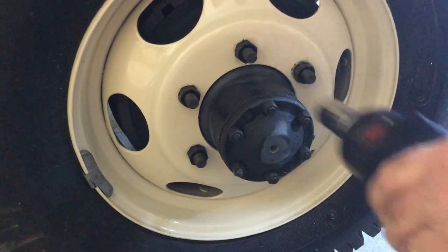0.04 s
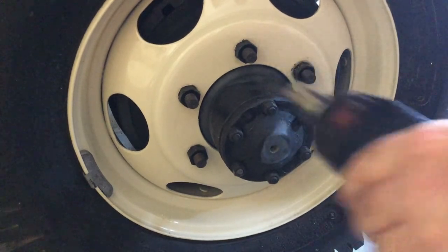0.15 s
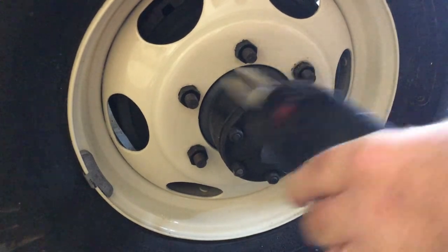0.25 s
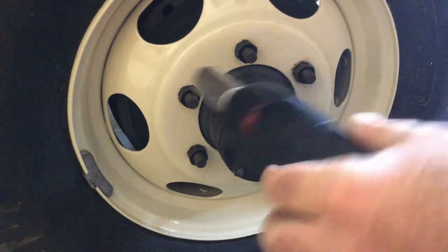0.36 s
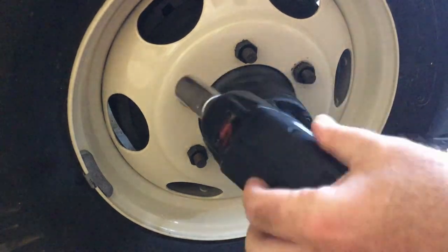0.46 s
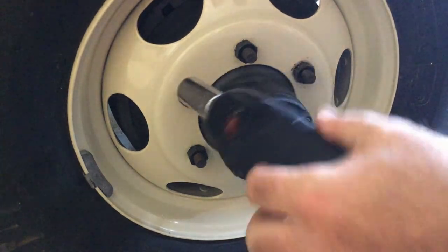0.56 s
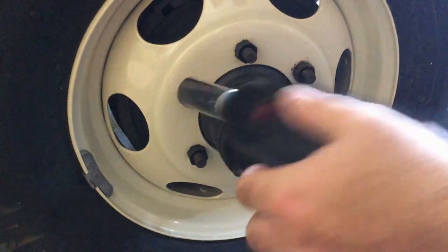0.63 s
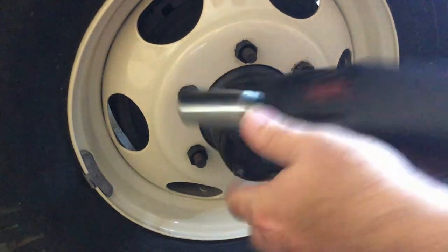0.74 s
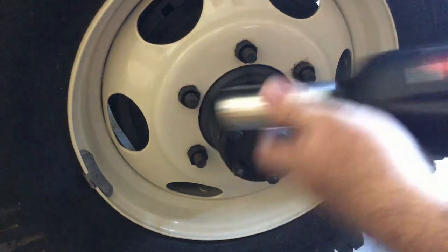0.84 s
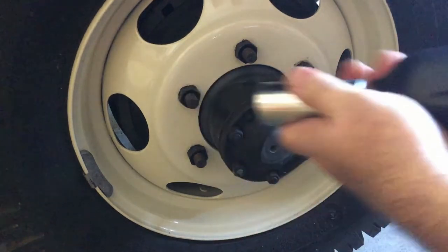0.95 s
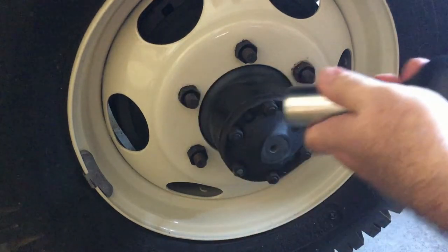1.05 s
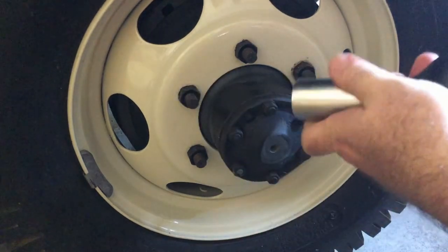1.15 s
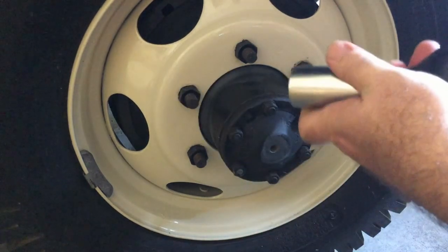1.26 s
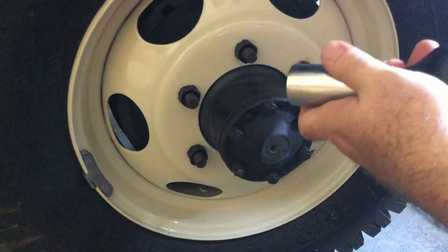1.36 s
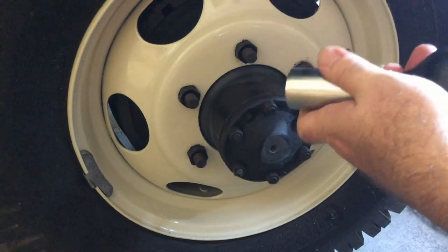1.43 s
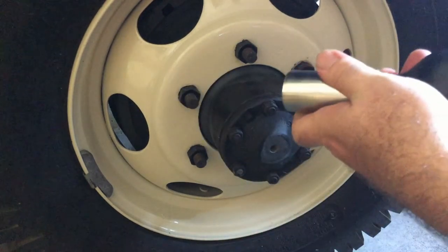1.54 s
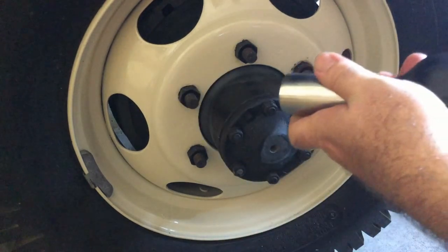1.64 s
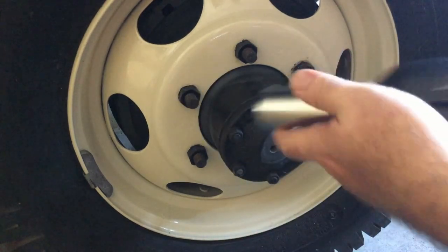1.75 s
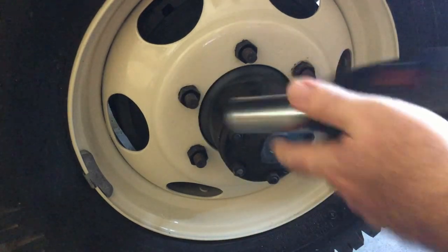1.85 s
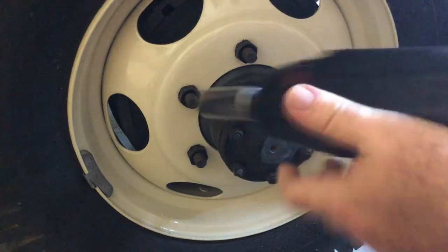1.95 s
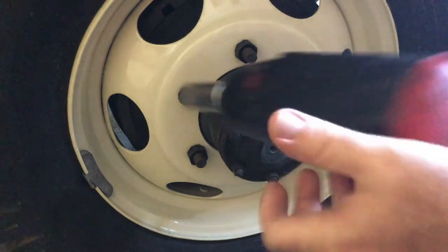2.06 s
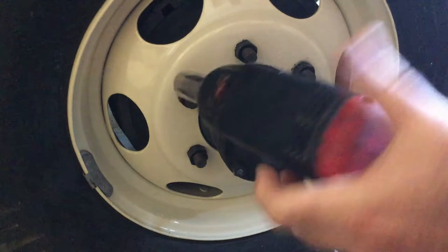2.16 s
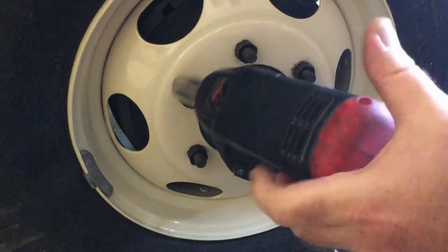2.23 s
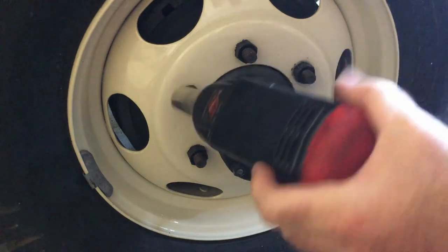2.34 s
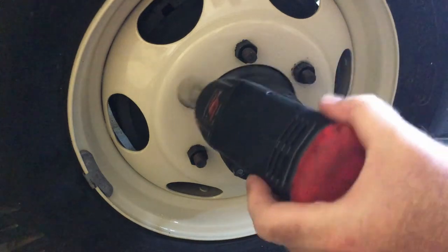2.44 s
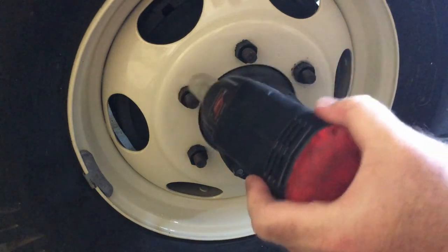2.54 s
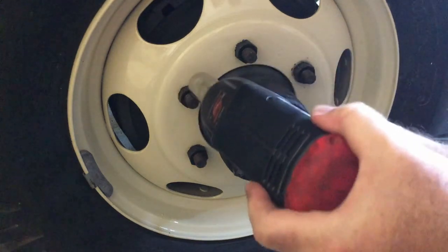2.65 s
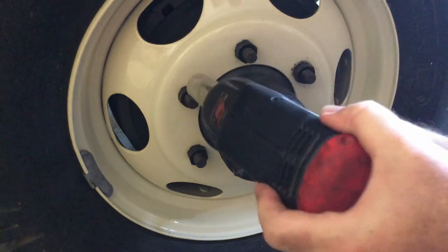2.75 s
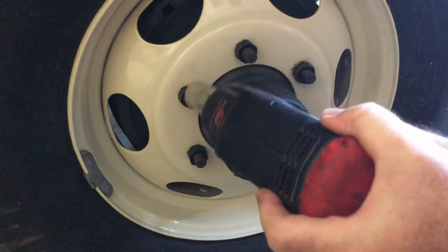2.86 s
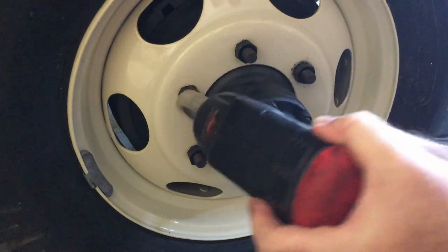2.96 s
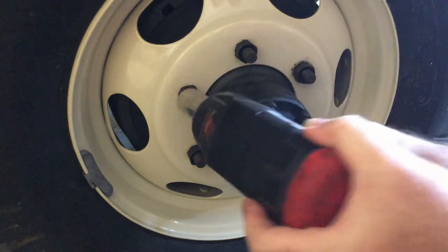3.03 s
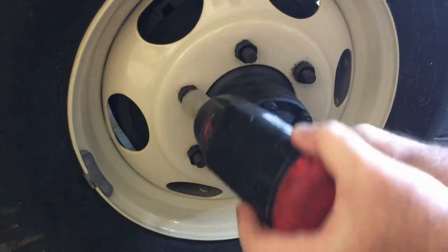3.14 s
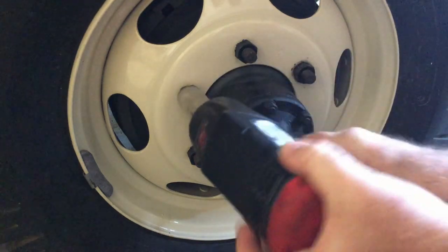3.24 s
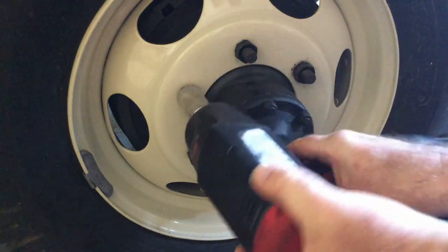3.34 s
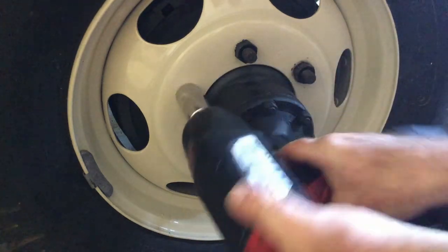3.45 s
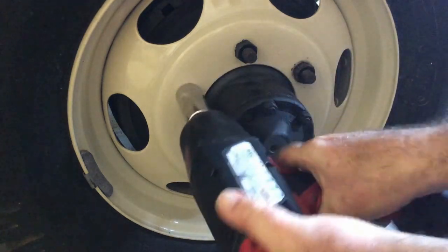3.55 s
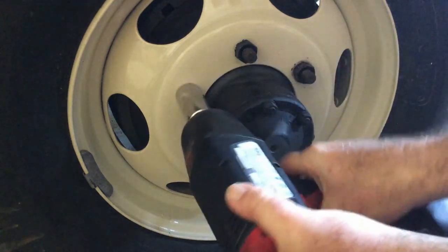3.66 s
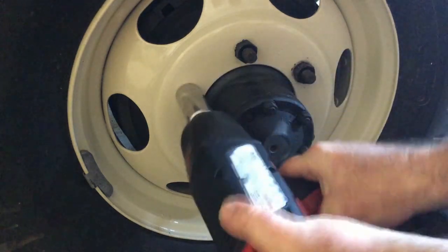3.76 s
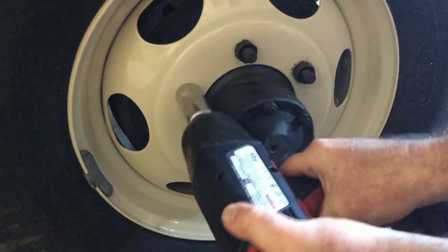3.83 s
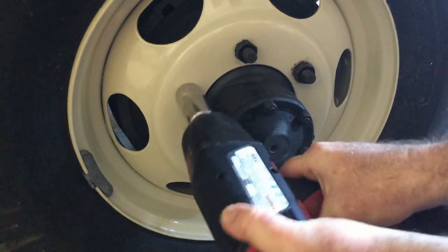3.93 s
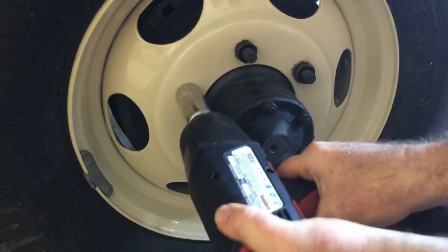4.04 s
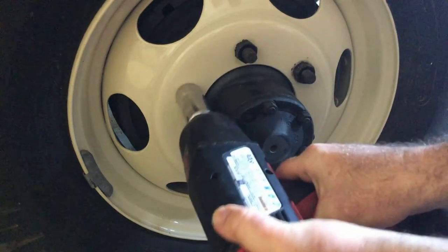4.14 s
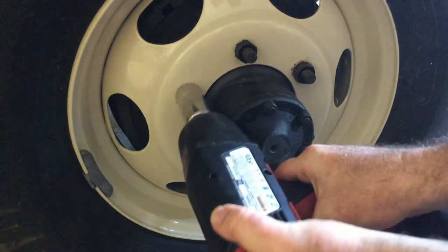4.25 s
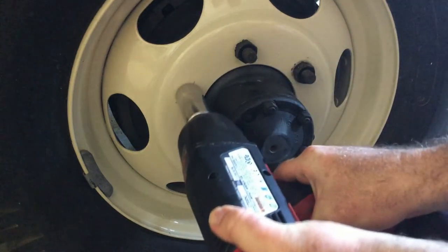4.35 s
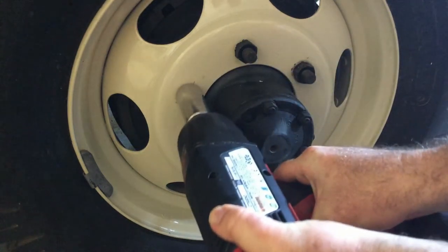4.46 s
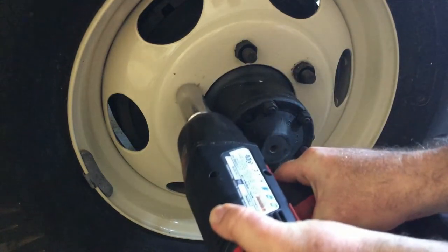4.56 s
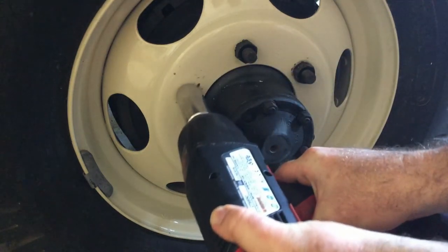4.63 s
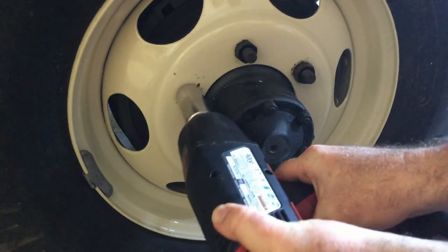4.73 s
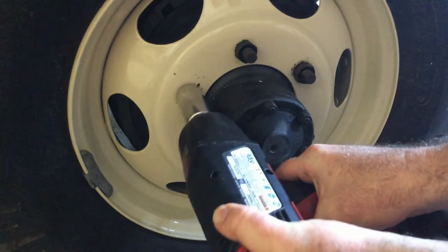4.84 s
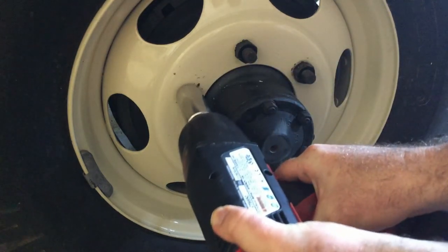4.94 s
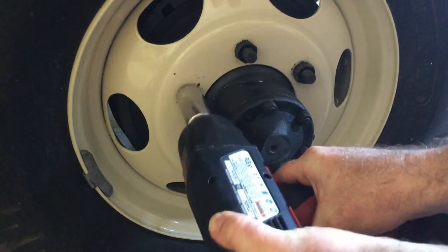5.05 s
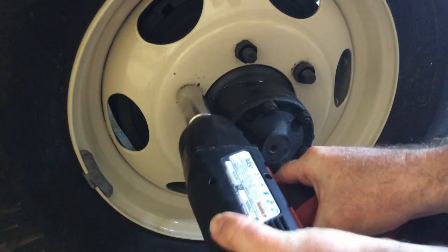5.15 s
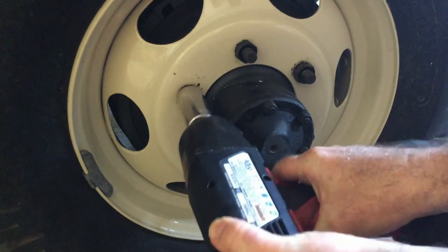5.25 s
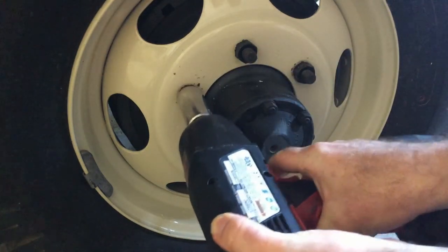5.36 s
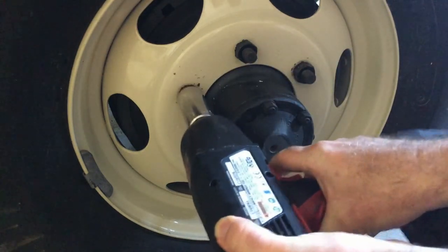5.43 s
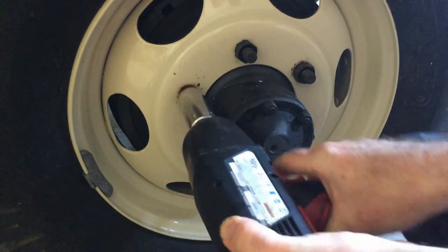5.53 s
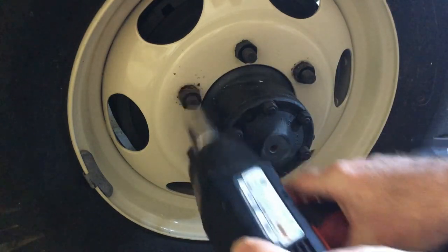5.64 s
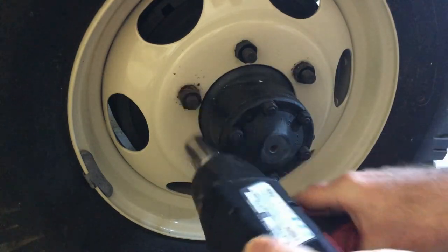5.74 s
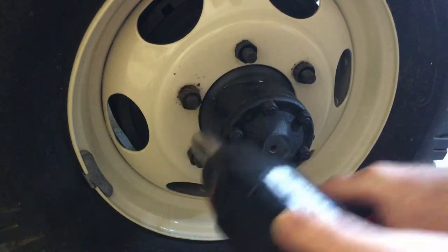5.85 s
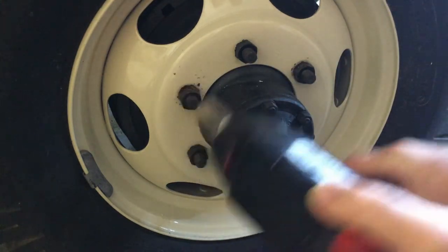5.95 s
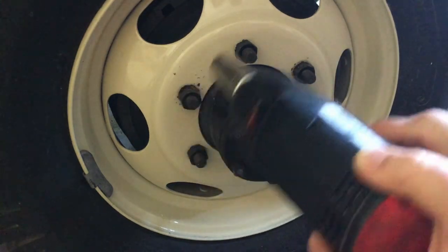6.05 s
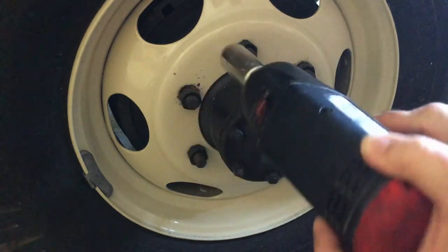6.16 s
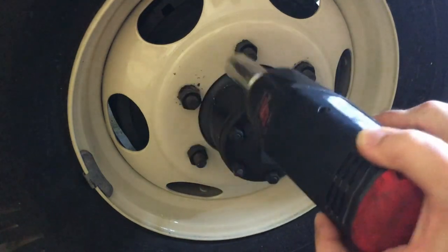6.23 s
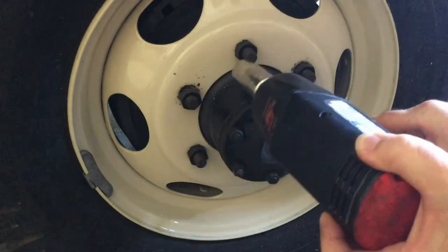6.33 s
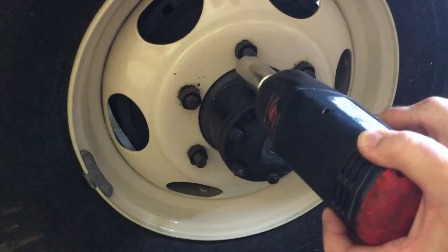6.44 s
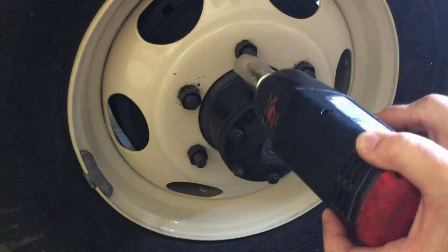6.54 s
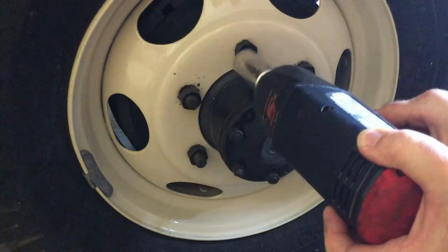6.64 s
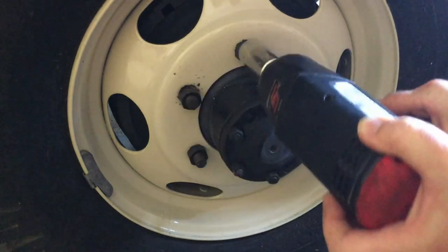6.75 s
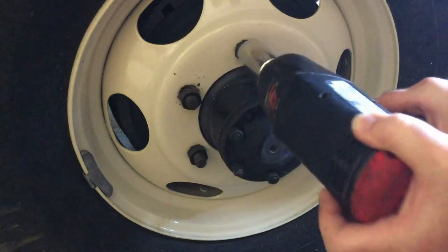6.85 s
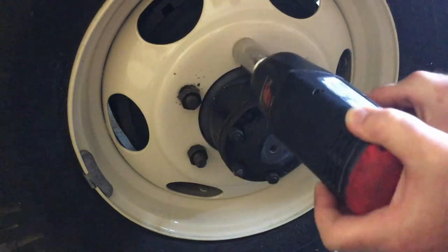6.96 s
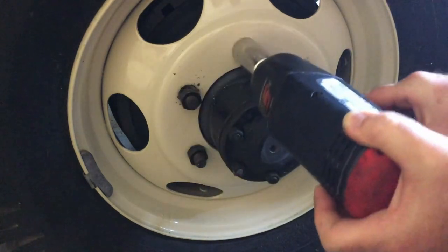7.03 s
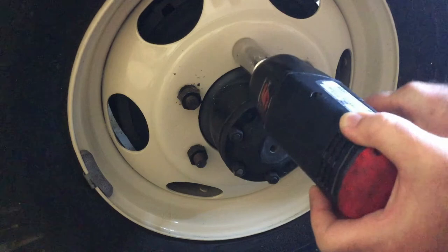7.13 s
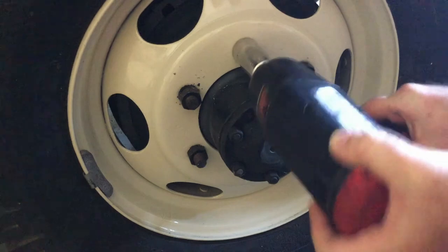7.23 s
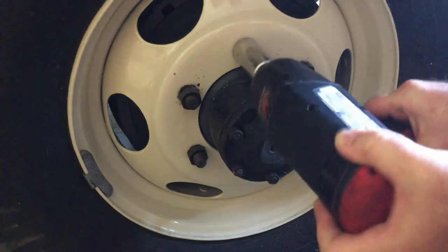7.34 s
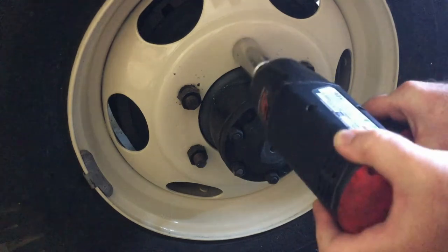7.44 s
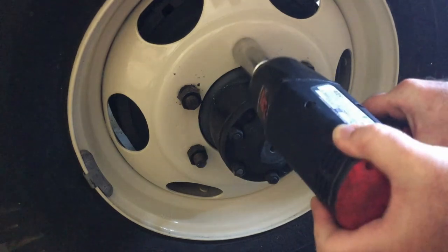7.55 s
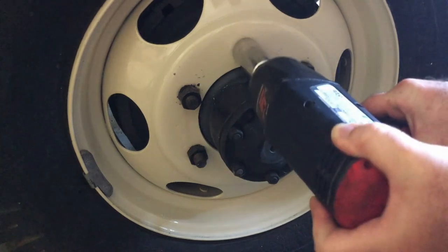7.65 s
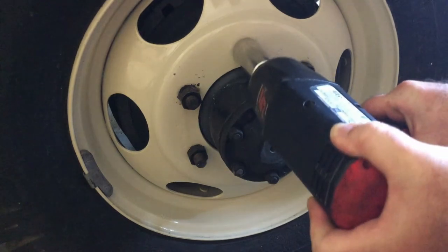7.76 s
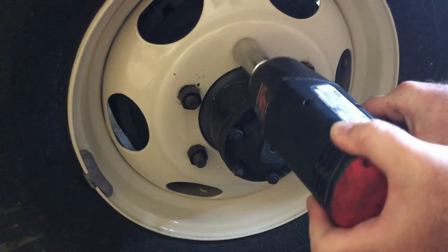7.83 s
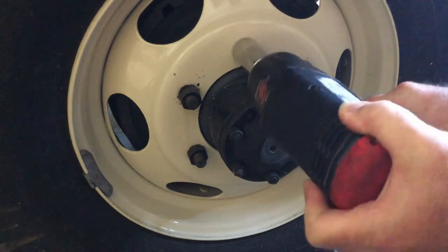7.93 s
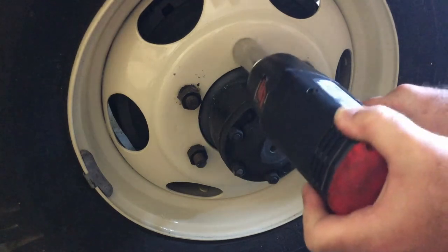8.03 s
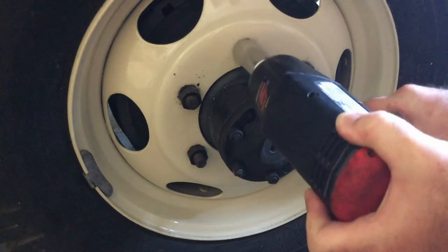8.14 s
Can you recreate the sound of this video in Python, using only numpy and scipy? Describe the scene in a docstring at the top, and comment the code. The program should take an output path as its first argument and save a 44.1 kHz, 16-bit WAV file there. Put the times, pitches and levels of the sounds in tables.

```python
"""A small garage, a phone microphone close to a steel truck wheel. As an earlier clatter dies away, a
cordless impact wrench runs slowly and free at 1 s, then its socket taps the lug nuts. From 3.7 s it hammers
in two bursts, each blow a cam knock, then the hammer's chatter ringing wheel and socket. More taps lead to
a third burst at 7.2 s, and the motor spins free with a rising whine. An appliance hums throughout."""
import sys
import numpy as np
from scipy import signal
from scipy.fft import rfft, irfft, next_fast_len
from scipy.io import wavfile
from scipy.ndimage import uniform_filter1d

SR = 44100
rng = np.random.default_rng(int(sys.argv[2]) if len(sys.argv) > 2 else 0)


def file_out(sig):
    """Save sig as 16-bit WAV at sys.argv[1]."""
    # one column per channel
    cols = np.atleast_2d(sig).T
    # limit, then scale
    lim = np.clip(cols, -1, 1)
    pcm = np.round(lim * 32767).astype(np.int16)
    wavfile.write(sys.argv[1], SR, pcm)


N = 361179
T = np.arange(N) / SR

# Table levels are relative; each layer adds its own gain.
# Three bursts of hammering, a row where pace or force changes.
# Each row: time in seconds, blow number, then treble, body, thump and cam knock in dB.
HAMMER_BURSTS = [
    [(3.7297, 0, -30, -21, -40, -36), (3.788, 1, -12.5, -12.5, -20, -4.5),
     (3.8614, 3, -17.5, -19.5, -23, -5.5), (3.963, 6, -16.5, -16.5, -19.5, -13.5),
     (4.2398, 14, -18, -14, -16, -14.5), (4.487, 21, -18.5, -13.5, -22, -20.5),
     (4.562, 23, -25, -15, -35, -13.5), (4.6058, 24, -19.5, -16, -20, -7.5),
     (4.738, 27, -19, -18.5, -20, -7), (4.972, 32, -20, -15.5, -21.5, -7)],
    [(5.1293, 0, -18.5, -15, -28, -4), (5.3152, 4, -18.5, -20.5, -18.5, -9),
     (5.3912, 5, -20, -17, -27, -19), (5.4195, 6, -23.5, -22.5, -38, -28)],
    [(7.2094, 0, -26.5, -15.5, -44, -34), (7.261, 1, -11.5, -10, -16, -5),
     (7.3727, 4, -14.5, -21.5, -16.5, -7), (7.5857, 10, -16.5, -16, -18, -20.5),
     (7.8066, 16, -22, -11, -17.5, -16), (7.8844, 18, -21.5, -17.5, -23, -11.5),
     (7.928, 19, -50, -24, -28.5, -33)],
]
# Blow-to-blow spread in dB of treble, body, thump and cam knock.
BLOW_SPREAD_DB = [1.1, 1.8, 3.0, 3.2]
# Socket touching nuts and wheel. Each row: start in seconds, click in dB, clunk and treble in dB over it.
SOCKET_TAPS = [(0.895, -39.5, -7.5, -15), (0.932, -47, -4, -5), (1.144, -18.5, -8.5, -4),
               (1.227, -28, -22, -20), (1.788, -53.5, -5, -26), (2.062, -57, 0, -1.5),
               (2.355, -41, 10, -14.5), (2.398, -56, -3, -16), (2.577, -48.5, 9, -16),
               (2.618, -56.5, 12.5, -14), (2.672, -63, 13, -16), (2.73, -47.5, -5, -5), (2.759, -57, 0, -8),
               (3.139, -31, -7, -11.5), (3.153, -26.5, 2.5, -19), (3.263, -28.5, -2, -22),
               (3.289, -28.5, 0, -17), (3.373, -65, 8, 1), (3.463, -22, 3, -13.5), (5.632, -29, -8, -9),
               (5.647, -27.5, -7.5, -18.5), (6.157, -53, -7.5, -0.5), (6.464, -43, 2.5, -12.5),
               (6.536, -71.5, 16, -8.5), (6.792, -47.5, 5.5, -15.5), (6.8, -35, -6, -17.5),
               (6.922, -31.5, -4, -18.5), (6.935, -35.5, -5, -12), (7.005, -34, 7.5, -8)]
# The loose socket rings. Each row: start in seconds, low modes in dB, high modes in dB.
SOCKET_PINGS = [(2.356, -70, -61), (2.61, -80, -70), (2.73, -75, -68), (3.137, -39, -43), (3.263, -60, -61),
                (5.632, -25.5, -38), (5.648, -24, -55), (6.59, -81, -63), (6.69, -76.5, -70.5),
                (6.797, -58, -55), (6.922, -62, -67)]
# It knocks on its turning shaft. Each row: start in seconds, level in dB.
SHAFT_KNOCKS = [(1.175, -40), (1.268, -32.5), (1.345, -39.5), (1.401, -34), (1.476, -42), (1.537, -35),
                (1.645, -43), (8.008, -29), (8.055, -29), (8.1, -28), (8.147, -27)]
# Its modes. Each row: pitch in Hz, level in dB, seconds to fall 60 dB.
SOCKET_LOW_MODES = [(3223, 5.5, 0.12), (3185, -25.5, 0.41)]
SOCKET_HIGH_MODES = [(12440, -2, 0.11), (12600, -3.5, 0.08), (12700, 2, .1), (12500, -15.5, .4),
                     (9000, -18, .1)]
# Light trigger. Each row: time in seconds, shaft tone in Hz, gear noise in dB, tones in dB over it.
LIGHT_TRIGGER = [(1.06, 346, -63, -20), (1.096, 333, -37.5, -24), (1.17, 376.7, -28, -28),
                 (1.22, 438.6, -32.5, -15), (1.282, 477.4, -28.5, -20.5), (1.52, 483.4, -30, -17),
                 (1.594, 369, -31, -14.5), (1.69, 348, -39.5, -22), (1.72, 326, -56, -16)]
# Shaft tones. Each row: multiple of the shaft tone, level in dB.
SHAFT_ORDERS = [(1, -5), (1.5, -5), (2, -3), (3, 3.5)]
# Two stretches of fast gear noise; the first dips and swells again between bursts.
# Each row: time in seconds, gear noise in dB.
FAST_RUNS = [
    [(3.695, -61), (3.73, -48), (3.78, -14), (3.82, -20), (4.6, -24), (4.98, -29), (5.05, -32.5),
     (5.11, -30.5), (5.33, -22), (5.42, -38), (5.5, -43), (5.62, -46.5), (5.86, -72.5)],
    [(7.165, -57), (7.21, -42), (7.25, -19), (7.6, -19.5), (7.9, -23), (7.97, -33.5), (8.12, -26),
     (8.19, -25.5)],
]
# Resonances. Each row: centre in Hz, width in Hz, level in dB.
WHEEL_MODES = [(408, 35, -11), (588, 140, -7), (824, 120, -7.5), (1268, 42, -3.5), (1585, 75, -5.5),
               (2208, 220, 3.5), (2460, 130, -3), (3290, 160, 6), (3604, 140, 5), (4140, 110, -3),
               (6120, 140, -10.5), (7060, 42, -16), (8470, 87, -13), (8750, 24, -13.5), (9610, 54, -11),
               (10600, 91, -12.5), (12730, 180, -12)]
HOUSING_IN_HAND = [(1450, 60, -8), (1980, 200, -1), (2200, 210, -1), (2810, 90, -11.5), (3100, 70, -10),
                   (3890, 110, -11.5), (4770, 160, -3)]
HOUSING_ON_NUT = [(1405, 100, 0.5), (2670, 120, -13), (4630, 110, -5)]
CAM_MODES, AIR_HISS = [(1456, 620, 0)], [(5000, 360, 0)]
# Noise spectra. Each row: frequency in Hz, density in dB.
STEEL_SPECTRUM = [(25, -28), (45, -4.5), (160, -2.5), (600, -4.5), (1200, -2.5), (2300, -1.5), (2950, -9.5),
                  (3600, -11.5), (4700, -9.5), (7500, -15), (9000, -12), (12500, -14.5), (16000, -21.5)]
SLOW_GEAR_SPECTRUM = [(250, -38.5), (480, -6.5), (600, -17.5), (1200, -5.5), (1900, -6.5), (2600, -4.5),
                      (3500, -11), (4800, -10), (5500, -17.5), (9000, -25), (12000, -27.5), (15000, -43.5)]
FAST_GEAR_SPECTRUM = [(120, -39), (250, -19.5), (900, -5), (1380, -5), (1700, -4.5), (2600, -2), (3600, -2),
                      (5000, -8.5), (7000, -13.5), (11000, -14.5), (16000, -30.5)]
AIR_SPECTRUM = [(25, -30), (55, 0.5), (120, -0.5), (300, -1), (400, -8.5), (520, -13), (1000, -15.5),
                (2000, -26), (4000, -33.5), (6300, -35), (13000, -42.5), (16000, -48.5)]
# The appliance in the background. Each row: pitch in Hz, level in dB.
HUM_LINES = [(59.2, -62.5), (118.4, -62.5), (145.3, -67), (193.8, -65.5), (242.2, -66), (296.1, -64),
             (355.3, -77.5), (947.5, -87)]
# The garage's echo. Each row: band centre in Hz, seconds to fall 60 dB, level in dB.
ECHO_BANDS = [(150, 0.98, -1), (397, 0.55, -7.5), (1020, .6, -7.5), (2400, 0.51, -8), (5004, 0.083, -10),
              (11000, .3, -11.5)]

CAM_LEAD_MS, CAM_WINDUP_MS = 8.5, 3.5  # the cam knocks ahead of each blow, earlier on a burst's second
BLOW_SPREAD_MS, LEAD_SPREAD_MS = 0.8, 1.1
CLICK_FALL_MS, HARD_TAP_DB, SHORTER_MS_PER_DB = 5.6, -25, 0.35  # hard taps are shorter
FREE_SPIN_S, SPIN_UP_S = 7.93, 0.056
WHINE_HZ, WHINE_DB, WHINE_LAG_HZ, WHINE_LAG_DB = 3800, -26, 660, -9  # the whine starts lower and softer


def blows():
    """Blows fall evenly between the rows of a burst; each strays a little in time and strength."""
    rows = []
    for burst in map(np.array, HAMMER_BURSTS):
        number = np.arange(burst[-1, 1] + 1)
        columns = [np.interp(number, burst[:, 1], burst[:, c]) for c in (0, 2, 3, 4, 5)]
        rows.extend(zip(number, *columns))
    rows = np.array(rows)
    stray = rng.standard_normal((len(rows), 6))
    lead_ms = CAM_LEAD_MS + CAM_WINDUP_MS * (rows[:, 0] == 1) + LEAD_SPREAD_MS * stray[:, 0]
    strike_s = rows[:, 1] + BLOW_SPREAD_MS / 1000 * stray[:, 1]
    levels_db = rows[:, 2:] + stray[:, 2:] * BLOW_SPREAD_DB
    return strike_s, strike_s - lead_ms / 1000, *levels_db.T


def hammer():
    """Cam knock, then strike: treble dies first, the wheel shudders on; a low thump with each blow."""
    strike_s, knock_s, treble_db, body_db, thump_db, knock_db = blows()
    treble = pulses(strike_s, treble_db + 5, 0.63, 3.2, 8.8)
    treble += pulses(knock_s, knock_db - 12, 0.3, 0.73, 4.4)
    body = pulses(strike_s, body_db - 2.5, 0.88, 7.8, 8.4)
    body += pulses(knock_s, knock_db - 3, 0.5, 1.3, 3.74)
    thump = pulses(strike_s, thump_db + 3.5, 3.8, 8.47, 5.4)
    thump += pulses(knock_s, knock_db - 10, 0.6, 2.5, 4.8)
    clank = ring(pulses(strike_s, body_db - 10.5, 1, 5.5, 11), WHEEL_MODES, 28)
    clank += ring(pulses(knock_s, knock_db - 4, 0.25, 1, 0.6), CAM_MODES, 28, uneven_db=0.5)
    strikes = treble * steel(4500, 19500, 2) + body * steel(700, 4100, 2.8, lift_db=1.5) + clank
    return strikes, thump * steel(53, 770, 0.89, lift_db=1.5)


def steel(lo_hz, hi_hz, chatter_db, lift_db=5):
    """Metal chattering on metal, coloured by the wheel; one band of it at rms 1."""
    chatter = rng.standard_normal(N) * undb(chatter_db * walk(700))
    return level(band(colour(chatter, STEEL_SPECTRUM, WHEEL_MODES, lift_db), lo_hz, hi_hz), 0)


def taps():
    """The socket scrapes briefly; lower parts of the wheel answer later, the tyre rumbles last."""
    start_s, db, clunk_db, treble_db = np.transpose(SOCKET_TAPS)
    thud_db = db - 7 + 1.6 * clunk_db  # a heavier tap clunks more, and thuds more still
    fall_ms = np.maximum(CLICK_FALL_MS - SHORTER_MS_PER_DB * np.maximum(db - HARD_TAP_DB, 0), 1)
    clunk = pulses(start_s, db + clunk_db + 2.5, 0.62, 1.7, 1.2 * fall_ms) * steel(450, 1300, 1.1, 3.5)
    click = pulses(start_s, db + 2.5, 0.48, 1.2, fall_ms) * steel(1700, 4500, 1.2, 3)
    treble = pulses(start_s, db + treble_db, 0.6, 0.9, 0.9 * fall_ms) * steel(5000, 14000, 1.5, 8)
    thud = pulses(start_s, thud_db + 4.5, 2.2, 1.1, 1.2 * fall_ms) * steel(280, 500, 0.85, 3)
    rumble = pulses(start_s, thud_db - 14.5, 14, 25, 86) * steel(100, 260, 0.55, 0.5)
    return clunk + click + treble + thud + rumble


def motor():
    """Gear noise flutters as the teeth rattle; shaft tones on the slow run, a whine on the free spin."""
    rattle = rng.standard_normal((2, N)) * undb(3.2 * walk(300) + walk(30))
    shaft = phase(curve(LIGHT_TRIGGER, 1, off=330) * (1 + 0.012 * walk(37.35)))
    tones = sum(undb(db + 2.4 * walk(22.3)) * np.sin(order * shaft) for order, db in SHAFT_ORDERS)
    tones *= undb(curve(LIGHT_TRIGGER, 3))
    slow = undb(curve(LIGHT_TRIGGER, 2)) * (level(colour(rattle[0], SLOW_GEAR_SPECTRUM), -8) + tones)
    swell = sum(undb(curve(run, 1)) for run in FAST_RUNS)
    fast = swell * level(colour(rattle[1], FAST_GEAR_SPECTRUM), 0)
    lag = np.exp(-np.maximum(T - FREE_SPIN_S, 0) / SPIN_UP_S)
    mesh = phase((WHINE_HZ - WHINE_LAG_HZ * lag) * (1 + 0.00066 * walk(60)))
    whine = np.sqrt(2) * (np.sin(mesh) + undb(-19) * np.sin(2 * mesh))
    whine *= (T > FREE_SPIN_S) * undb(WHINE_DB + WHINE_LAG_DB * lag + 0.93 * walk(46))
    return slow + fast + whine


def housing():
    """Loose parts rattle the housing, hardest when the socket knocks; on the nut it rings differently."""
    start_s, db = np.transpose(SHAFT_KNOCKS)
    knocks = pulses(start_s, db, 3, 8.2, fall_ms=np.where(start_s > FREE_SPIN_S, 6.9, 9.8))
    on_nut = T > FREE_SPIN_S
    rattle = knocks * ~on_nut + undb(curve(LIGHT_TRIGGER, 2) - 17)
    in_hand = ring(rattle, HOUSING_IN_HAND, 22, sharpen=1.1, uneven_db=3)
    return in_hand + ring(knocks * on_nut, HOUSING_ON_NUT, 26, sharpen=0.81, uneven_db=0)


def socket():
    """Modes of the loose socket, wavering as it wobbles on its shaft."""
    start_s, low_db, high_db = np.transpose(SOCKET_PINGS)
    out, t = 0, T[:SR]
    for push_db, modes in ((low_db, SOCKET_LOW_MODES), (high_db, SOCKET_HIGH_MODES)):
        push = np.zeros(N)
        push[(start_s * SR).astype(int)] = undb(push_db)
        ping = sum(undb(db) * np.sin(2 * np.pi * hz * t) * 1000 ** (-t / t60) for hz, db, t60 in modes)
        out += signal.fftconvolve(push, ping)[:N]
    return out * undb(2.3 * walk(40))


def earlier_clatter():
    """The echo of earlier clatter, still dying away."""
    return undb(-52) * np.exp(-T / 0.037) * steel(370, 8200, 0.6)


def rustle():
    """A faint treble rustle swells and fades around 5.93 s."""
    swell = np.exp(-0.5 * ((T - 5.93) / 0.048) ** 2) * undb(2.8 * walk(40))
    return swell * level(band(rng.standard_normal(N), 6800, 15000), -68)


def garage(x):
    """Diffuse echo from the room, dying faster in the treble."""
    t, tail = T[:SR], 0
    for hz, t60, db in ECHO_BANDS:
        noise = band(rng.standard_normal(SR), hz / 1.52, min(hz * 1.544, 18000))
        tail += undb(db) * noise * 1000 ** (-t / t60) * np.sqrt(15.2 / t60 / SR)
    return signal.fftconvolve(x, tail * (1 - np.exp(-t / 0.002)))[:N]


def appliance():
    """Wavering hum lines over the room tone, which carries a narrow hiss."""
    hum = sum(undb(db + 3 + 2.5 * walk(8.7)) * np.sin(2 * np.pi * hz * T + walk(3.8))
              for hz, db in HUM_LINES)
    drift = undb(1.1 * walk(4.6))
    air = colour(rng.standard_normal(N), AIR_SPECTRUM, AIR_HISS, lift_db=13)
    return hum + drift * level(air, -59)


def ring(drive, modes, flutter_rate, sharpen=1, uneven_db=5):
    """Modes ring on after rough contact; the favoured ones keep changing."""
    out = 0
    for hz, width, db in modes:
        push = drive * undb(uneven_db * walk(flutter_rate)) * rng.standard_normal(N)
        mode = signal.lfilter(*signal.iirpeak(hz, hz / (sharpen * width), SR), push)
        out += undb(db) * mode * np.sqrt(SR / (np.pi * sharpen * width))
    return out


def pulses(start_s, db, rise_ms, hold_ms, fall_ms):
    """Envelope of events that rise, hold and die away (fall_ms per 1/e)."""
    out = np.zeros(N + SR)
    ms = np.arange(int(SR * min(np.max(fall_ms) / 100 + 0.02, 1))) / SR * 1000
    for start, gain, hold, fall in zip(*np.broadcast_arrays(start_s, undb(db), hold_ms, fall_ms)):
        shape = (1 - np.exp(-ms / rise_ms)) * np.exp(-np.maximum(ms - hold, 0) / fall)
        out[int(start * SR):int(start * SR) + len(ms)] += gain * shape
    return out[:N]


def colour(x, spectrum, peaks=(), lift_db=0):
    """Shape x to a spectrum, each peak raised by lift_db; rms gain 1 on white noise."""
    size = next_fast_len(N, True)
    hz = np.arange(1, size // 2 + 2) * SR / size
    point_hz, point_db = np.transpose(spectrum)
    gain = undb(np.interp(np.log(hz), np.log(point_hz), point_db))
    for centre, width, _ in peaks:
        gain *= 1 + (undb(lift_db) - 1) / (1 + (2 * (hz - centre) / width) ** 2)
    return irfft(rfft(x, size) * gain / np.sqrt(np.mean(gain ** 2)), size)[:N]


def walk(rate):
    """Random levels held 1 / rate s and slewed; spread near 1."""
    hold = int(SR / rate)
    return 1.15 * uniform_filter1d(np.repeat(rng.standard_normal(N // hold + 1), hold), hold)[:N]


def curve(table, column, off=-120):
    rows = np.array(table)
    return np.interp(T, rows[:, 0], rows[:, column], off, off)


def band(x, lo_hz, hi_hz):
    return signal.sosfilt(signal.butter(3, [lo_hz, hi_hz], "band", fs=SR, output="sos"), x)


def phase(hz):
    return 2 * np.pi * np.cumsum(hz) / SR


def level(x, db):
    return x * undb(db) / np.sqrt(np.mean(x ** 2))


def undb(db):
    return 10 ** (np.asarray(db) / 20)


def scene():
    """Wrench and wheel close to the microphone, the garage behind; the thumps stay nearly dry."""
    strikes, thumps = hammer()
    wrench = strikes + taps() + motor() + housing()
    pings = socket()
    background = earlier_clatter() + rustle()
    echo = garage(wrench + undb(-13) * thumps + undb(-8.5) * pings)
    return (wrench + pings + thumps + echo + background + appliance())[None]


def record(dry):
    """The phone drops the deepest bass, rounds the loudest peaks and cuts the top."""
    heard = signal.sosfilt(signal.butter(2, 42, "high", fs=SR, output="sos"), dry)
    rounded = np.tanh(1.3 * heard) / 1.3
    return signal.sosfilt(signal.ellip(12, 0.2, 90, 15850, fs=SR, output="sos"), rounded)


dry = scene()
out = record(dry)
file_out(out)
```